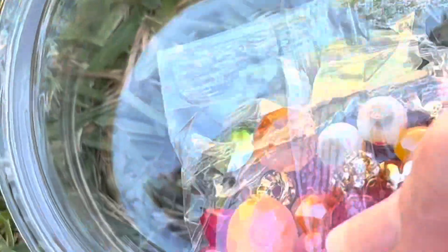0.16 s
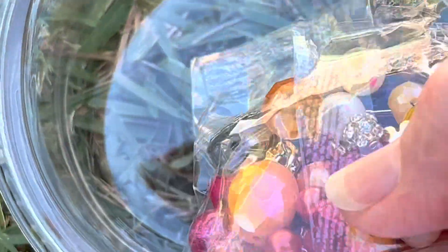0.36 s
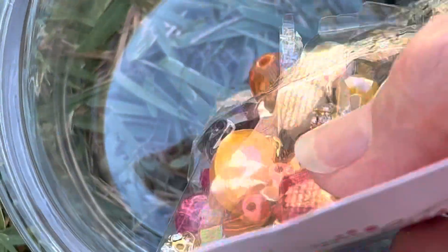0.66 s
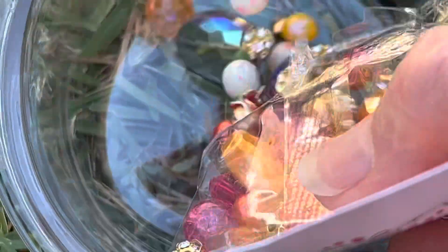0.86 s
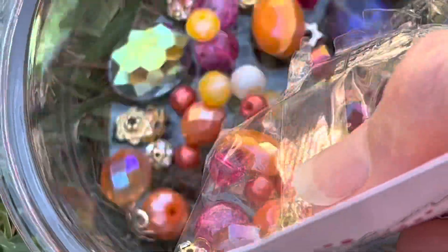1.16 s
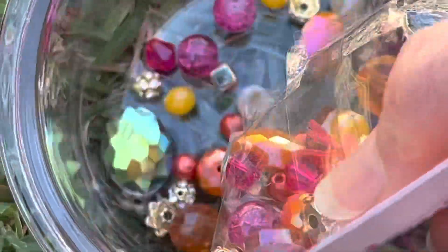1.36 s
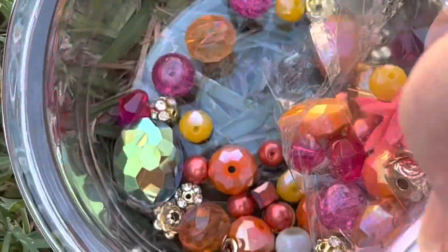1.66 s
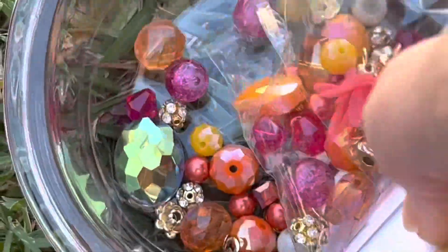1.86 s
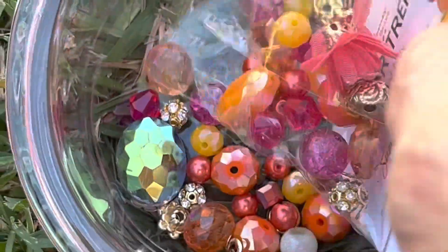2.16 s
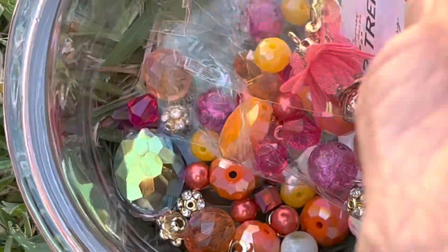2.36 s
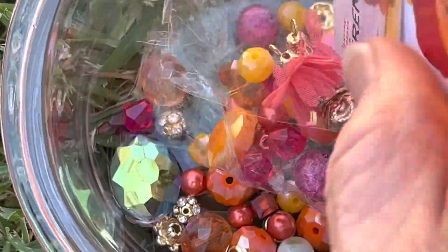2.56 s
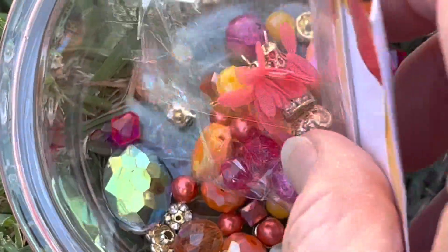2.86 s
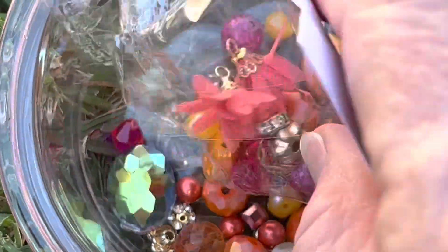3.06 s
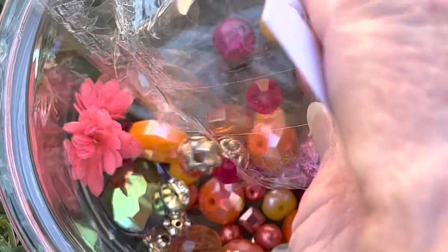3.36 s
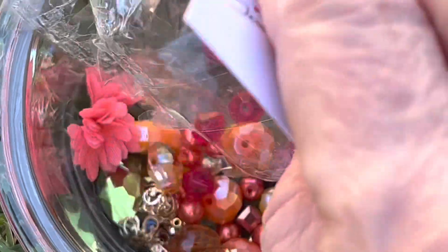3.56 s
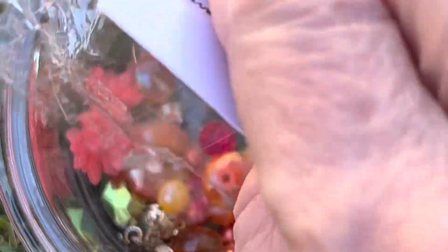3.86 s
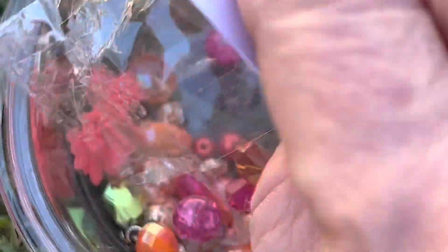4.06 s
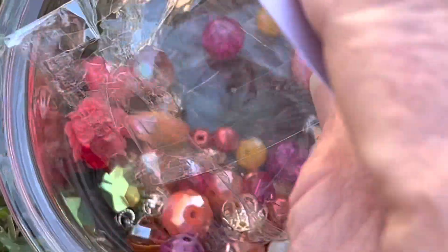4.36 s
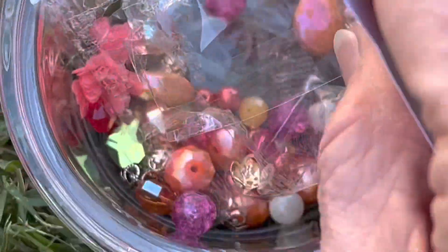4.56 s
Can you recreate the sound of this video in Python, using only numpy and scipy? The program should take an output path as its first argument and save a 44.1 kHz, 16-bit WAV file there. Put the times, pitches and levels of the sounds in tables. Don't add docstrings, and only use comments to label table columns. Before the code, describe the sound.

A close, dry stereo recording outdoors, with a quiet low hum of distant traffic and a faint motor throughout. Thin plastic creases snap near 0.1 and 0.3 seconds, then rustling gathers from 0.65. At about 0.8 glass beads and metal caps spill into a bowl on grass: a dense, bright clatter until roughly 1.4, with piercing high clinks, short metallic rings, dull bowl knocks and bag crackle. Strong plastic snaps come around 1.35 to 1.43. From 1.5 to 1.75 a bead bounces rapidly to rest amid rolling jingle. Only faint clinks and bag rustles remain until sharp creases near 2.8. From 3.0 to 4.0 the rest is shaken out in sparse, uneven clicks, strongest around 3.45. A brighter cluster of metal pings and hard clacks rings from 4.07 to 4.4, then it quiets to hum with slight plastic ticks.

```python
import sys
import numpy as np
from scipy import signal
from scipy.fft import rfft, irfft, next_fast_len
from scipy.io import wavfile
from scipy.ndimage import uniform_filter1d

SR = 44100
rng = np.random.default_rng(int(sys.argv[2]) if len(sys.argv) > 2 else 0)


def wav_out(sig):
    wavfile.write(sys.argv[1], SR, np.round(np.clip(np.atleast_2d(sig).T, -1, 1) * 32767).astype(np.int16))


def decibels_to_gain(level_db):
    exponent = np.asarray(level_db, float) / 20
    return 10 ** exponent


N = 208433

# freq_hz, density_db
HUM_SPECTRUM = [(30, -17.5), (55, 2), (110, -2.5), (220, -12.5), (400, -23.5), (900, -31.5), (2000, -35.5),
                (3200, -40), (5500, -37.5), (9000, -51), (15000, -60.5)]
# freq_hz, coherence (0 to 1)
HUM_COHERENCE = [(200, .994), (520, .15), (2600, .97)]
# freq_hz, level_db
MOTOR_LINES = [(119, -58.0), (237, -61.0)]
# freq_hz, gain_db, lead_rad
PORT_RESPONSE = [(200, 0, 0), (500, -3, -.3), (1000, -4, -.1), (1370, -10, -1.5), (1530, -2.5, -3.1),
                 (1640, 3.5, -3.0), (1720, 2, 0), (2400, 1, -.2), (5000, 0, .1), (5700, 0, .9),
                 (7000, 0, 1.2), (7750, 0, 3.08), (8650, 0, 3.2), (9300, 0, 4.1), (12300, 0, 6.35),
                 (13900, 0, 7.95), (14600, 0, 9.42)]

# peak_s, crackle_db, rise_s (per 20 dB), fall_s (per 20 dB)
HAND_MOVES = [(0.089, -44.5, .027, .027), (0.325, -54.5, .095, .21), (0.904, -32, .25, .4),
              (1.101, -33, .3, .5), (1.42, -45, .3, .4), (1.937, -50, .3, .14), (2.243, -45.5, .14, .06),
              (2.62, -53.5, .25, .08), (2.848, -45, .08, .08), (3.015, -50, .12, .23),
              (3.153, -44, .04, .35), (3.32, -43.5, .25, .3), (3.48, -41, .3, .13), (3.773, -51, .3, .12),
              (3.965, -41.5, .12, .22), (4.085, -41, .06, .24), (4.273, -41, .25, .04),
              (4.348, -50, .04, .08)]
# time_s, jingle_db
ROLLING_LEVEL = [(0.732, -81), (0.904, -29.5), (1.101, -22), (1.491, -36), (1.547, -24.5), (1.612, -44),
                 (1.802, -49), (1.937, -73), (2.08, -86), (3.12, -80), (3.48, -36.5), (3.568, -70),
                 (3.636, -86), (3.773, -39), (3.853, -69), (4.2, -72), (4.273, -57), (4.45, -85)]
# freq_hz, level_db, t60_s
JINGLE_MODES = [(9290, 0, .06), (13080, -6, .05), (13830, -6, .05), (15720, -5, .04), (5620, -13, .035)]
# freq_hz, level_db, t60_s
BOWL_MODES = [(1190, -2.5, 0.0087), (1690, -1, 0.0042), (2420, -10, 0.0044)]

# start_s, floor_db, wall_db, crack_db
POUR_CONTACTS = [(0.8105, -39.0, -29.0, -48.0), (0.8368, -41.0, -27.0, -42.0),
                 (0.8702, -43.0, -25.0, -36.0), (0.8902, -43.0, -25.0, -38.0), (0.908, -33.0, -21.0, -37.0),
                 (0.9412, -26.0, -34.0, -34.0), (0.9493, -32.0, -26.0, -33.0),
                 (0.9569, -23.0, -33.0, -27.0), (0.9752, -38.0, -22.0, -32.0),
                 (0.9819, -27.0, -26.0, -29.0), (0.9904, -28.0, -33.0, -26.0),
                 (0.9977, -25.0, -29.0, -27.0), (1.0063, -26.0, -30.0, -26.0),
                 (1.0148, -21.0, -26.0, -30.0), (1.0237, -35.0, -28.0, -34.0),
                 (1.0334, -31.0, -26.0, -28.0), (1.0428, -25.0, -23.0, -29.0),
                 (1.0546, -45.0, -30.0, -30.0), (1.0826, -40.0, -31.0, -30.0),
                 (1.0886, -32.0, -26.0, -31.0), (1.0987, -23.0, -29.0, -25.0),
                 (1.1035, -27.0, -27.0, -26.0), (1.1109, -33.0, -29.0, -37.0),
                 (1.1235, -27.0, -26.0, -34.0), (1.1329, -28.0, -39.0, -29.0),
                 (1.1435, -33.0, -38.0, -36.0), (1.1531, -32.0, -38.0, -36.0),
                 (1.1619, -26.0, -29.0, -32.0), (1.195, -35.0, -33.0, -26.0), (1.1999, -32.0, -31.0, -35.0),
                 (1.2177, -30.0, -32.0, -32.0), (1.2292, -36.0, -44.0, -33.0),
                 (1.2359, -31.0, -32.0, -33.0), (1.2453, -33.0, -34.0, -30.0),
                 (1.2682, -33.0, -34.0, -34.0), (1.273, -30.0, -33.0, -39.0), (1.304, -30.0, -35.0, -31.0),
                 (1.3162, -26.0, -36.0, -32.0), (1.3286, -28.0, -37.0, -36.0),
                 (1.3675, -30.0, -29.0, -28.0), (1.3936, -34.0, -41.0, -33.0),
                 (1.4173, -48.0, -29.0, -34.0), (1.4683, -44.0, -35.0, -43.0),
                 (1.5033, -48.0, -37.0, -44.0), (1.5143, -47.0, -32.0, -45.0)]
# start_s, floor_db, wall_db, crack_db
SHAKE_CONTACTS = [(2.9366, -45.0, -53.0, -61.0), (2.971, -53.0, -43.0, -54.0),
                  (3.1111, -46.0, -41.0, -51.0), (3.1473, -42.0, -35.0, -39.0),
                  (3.1548, -36.0, -35.0, -37.0), (3.1594, -34.0, -40.0, -51.0),
                  (3.1683, -51.0, -35.0, -39.0), (3.1826, -53.0, -40.0, -50.0),
                  (3.2014, -38.0, -41.0, -45.0), (3.2236, -43.0, -33.0, -35.0),
                  (3.2486, -46.0, -36.0, -39.0), (3.2767, -43.0, -48.0, -56.0),
                  (3.294, -45.0, -37.0, -44.0), (3.3421, -40.0, -46.0, -34.0),
                  (3.3816, -48.0, -37.0, -35.0), (3.3943, -46.0, -36.0, -38.0),
                  (3.453, -37.0, -29.0, -32.0), (3.497, -40.0, -45.0, -55.0), (3.5179, -43.0, -36.0, -43.0),
                  (3.5991, -60.0, -46.0, -55.0), (3.6413, -57.0, -47.0, -53.0),
                  (3.7039, -59.0, -41.0, -56.0), (3.7716, -39.0, -38.0, -42.0),
                  (3.7778, -39.0, -42.0, -51.0), (3.848, -48.0, -47.0, -44.0),
                  (3.8675, -42.0, -51.0, -45.0), (3.9152, -49.0, -41.0, -45.0),
                  (3.9504, -58.0, -33.0, -46.0), (3.9602, -53.0, -39.0, -40.0),
                  (3.9718, -39.0, -36.0, -48.0), (3.9769, -40.0, -31.0, -48.0),
                  (4.1012, -42.0, -31.0, -36.0), (4.1244, -35.0, -26.0, -39.0),
                  (4.1289, -38.0, -38.0, -45.0), (4.1458, -38.0, -38.0, -42.0),
                  (4.2106, -37.0, -38.0, -40.0), (4.2204, -46.0, -36.0, -39.0),
                  (4.2297, -41.0, -36.0, -46.0), (4.2425, -53.0, -43.0, -41.0),
                  (4.376, -44.0, -59.0, -46.0)]
# start_s, floor_db, wall_db, crack_db
BAG_CONTACTS = [(0.0808, -53.0, -46.0, -46.0), (0.3136, -49.0, -44.0, -51.0), (0.4991, -64.0, -49.0, -60.0),
                (0.5954, -64.0, -42.0, -53.0), (0.6685, -51.0, -40.0, -58.0), (0.6736, -48.0, -37.0, -42.0),
                (0.6898, -48.0, -41.0, -47.0), (0.7063, -52.0, -39.0, -44.0), (0.7399, -51.0, -36.0, -37.0),
                (0.7514, -42.0, -38.0, -45.0), (0.7726, -47.0, -33.0, -35.0), (0.7776, -47.0, -35.0, -38.0),
                (1.7516, -43.0, -38.0, -43.0), (1.8558, -46.0, -52.0, -47.0), (1.911, -54.0, -48.0, -53.0),
                (1.94, -45.0, -52.0, -52.0), (1.9859, -53.0, -50.0, -48.0), (2.1492, -51.0, -49.0, -53.0),
                (2.1782, -46.0, -53.0, -48.0), (2.2139, -44.0, -38.0, -47.0), (2.2239, -50.0, -39.0, -43.0),
                (2.2365, -53.0, -36.0, -47.0), (2.2419, -50.0, -41.0, -54.0), (2.2482, -46.0, -35.0, -52.0),
                (2.2602, -48.0, -48.0, -50.0), (2.4365, -60.0, -49.0, -63.0), (2.5871, -69.0, -53.0, -48.0),
                (2.7741, -44.0, -42.0, -51.0), (2.8446, -42.0, -47.0, -42.0), (2.8527, -39.0, -45.0, -46.0),
                (2.8579, -52.0, -40.0, -48.0)]
# start_s, floor_db, wall_db, crack_db
CREASE_SNAPS = [(0.0754, -59.0, -46.0, -33.0), (0.0979, -48.0, -44.0, -32.0), (0.1148, -38.0, -27.0, -29.0),
                (0.275, -51.0, -33.0, -33.0), (0.294, -47.0, -42.0, -45.0), (0.5396, -56.0, -48.0, -35.0),
                (0.62, -55.0, -42.0, -46.0), (0.6845, -41.0, -32.0, -34.0), (0.714, -46.0, -37.0, -24.0),
                (0.746, -35.0, -28.0, -25.0), (0.768, -43.0, -35.0, -34.0), (1.3418, -37.0, -22.0, -21.0),
                (1.425, -23.0, -23.0, -15.0), (1.437, -27.0, -28.0, -17.0), (1.925, -35.0, -47.0, -30.0),
                (1.9352, -38.0, -36.0, -36.0), (2.0035, -45.0, -46.0, -42.0), (2.1713, -37.0, -40.0, -30.0),
                (2.7246, -47.0, -41.0, -38.0), (2.7919, -38.0, -33.0, -32.0), (2.8022, -44.0, -39.0, -38.0),
                (2.8203, -38.0, -29.0, -21.0), (2.8381, -35.0, -30.0, -16.0), (3.0149, -24.0, -32.0, -32.0),
                (3.0238, -31.0, -30.0, -26.0), (3.0583, -39.0, -34.0, -26.0), (3.0825, -33.0, -48.0, -34.0),
                (4.0185, -37.0, -25.0, -41.0), (4.4749, -56.0, -50.0, -32.0), (4.687, -48.0, -49.0, -47.0)]
# start_s, floor_db, wall_db, tick_db
HARD_CLACKS = [(0.483, -65.0, -48.0, -45.0), (0.7853, -22.0, -28.0, -25.0), (0.8265, -26.0, -32.0, -37.0),
               (0.8454, -36.0, -35.0, -14.0), (0.8749, -18.0, -22.0, -21.0), (0.8957, -23.0, -23.0, -23.0),
               (0.9212, -19.0, -31.0, -21.0), (0.926, -19.0, -21.0, -19.0), (0.9694, -22.0, -19.0, -16.0),
               (1.1683, -34.0, -30.0, -26.0), (1.1787, -30.0, -29.0, -17.0), (1.3487, -30.0, -28.0, -27.0),
               (1.4088, -35.0, -35.0, -24.0), (1.5362, -32.0, -38.0, -27.0), (1.7622, -43.0, -49.0, -37.0),
               (1.85, -43.0, -53.0, -31.0), (2.562, -52.0, -52.0, -37.0), (3.0805, -34.0, -40.0, -31.0),
               (3.1423, -48.0, -32.0, -24.0), (3.3473, -43.0, -41.0, -27.0), (3.4351, -35.0, -37.0, -22.0),
               (3.4471, -57.0, -26.0, -20.0), (3.4845, -30.0, -32.0, -34.0), (3.536, -44.0, -39.0, -25.0),
               (3.6708, -58.0, -39.0, -33.0), (3.7608, -44.0, -38.0, -33.0), (4.073, -35.0, -23.0, -18.0),
               (4.141, -38.0, -38.0, -27.0), (4.1518, -36.0, -38.0, -20.0), (4.1826, -37.0, -31.0, -35.0),
               (4.3351, -41.0, -53.0, -25.0)]

# start_s, main_db, face_db, t60_s
CAP_STRIKES = [(0.8459, -15.5, -23, .042), (0.9207, -53, -48, .104), (0.939, -24, -36, .04),
               (0.977, -31, -36, .06), (0.9978, -31, -40, .08), (1.054, -23, -35, .12),
               (1.0655, -27, -40, .06), (1.082, -27, -42, .035), (1.102, -31, -28, .052),
               (1.124, -31, -42, .06), (1.142, -44, -49, .14), (1.1963, -40, -41, .4),
               (1.27, -37, -53, .06), (1.3212, -33, -40, .055), (1.3655, -30, -46, .04),
               (2.033, -66, -80, .3), (3.974, -48, -65, .06), (4.0747, -16, -23, .062),
               (4.1019, -21, -52, .06), (4.125, -55, -55, .1), (4.141, -42, -52, .1),
               (4.1847, -17, -29, .066), (4.22, -23.5, -44, .07), (4.2434, -33, -42, .14),
               (4.257, -30, -45, .2), (4.3364, -27, -48, .2), (4.3829, -34.5, -56, .11)]
# freq_hz, decay_speed (against the main mode)
CAP_MODES = [(5615, 1.0), (2378, .75), (9950, 1.05), (15720, 1.1)]

# first_hz, second_hz
SHARED_MODE_HZ = (9275, 9322)
# freq_hz, decay_speed (against the shared mode)
UPPER_MODES = [(13080, 1.1), (13830, 1.3), (15615, 1.0)]
# start_s, shared_db, own_db, t60_s
FIRST_STRIKES = [(0.7858, -10.5, -19.5, .068), (0.8268, -12.5, -18.5, .047), (0.8748, -11.5, -29, .12),
                 (0.8953, -14, -18, .118), (0.9025, -13, -20, .09), (0.9812, -9.5, -26, .14),
                 (1.0333, -36, -26, .3), (1.0527, -24, -33, .28), (1.0913, -26, -20, .23),
                 (1.2077, -16, -31.5, .061), (1.8139, -30, -53, .04), (1.8631, -32.5, -50, .11),
                 (1.9246, -37.5, -62, .13), (2.565, -45, -67, .05), (2.627, -40, -48, .06),
                 (2.711, -39.5, -49, .057), (4.2192, -27, -35, .03)]
# start_s, shared_db, own_db,
# t60_s
FLOOR_BOUNCES = [
    (1.5517, -11, -30, .047),
    (1.5971, -12.5, -27, .064),
    (1.6319, -26, -35, .138),
    (1.6463, -15, -27, .079),
    (1.6635, -17.5, -32, .083),
    (1.6974, -16, -23, .056),
    (1.7238, -16.5, -21, .022),
    (1.7411, -24, -33, .12),
]
# start_s, shared_db, own_db, t60_s
SECOND_STRIKES = [(0.9209, -15, -23, .11), (0.9662, -20, -26, .068), (1.0155, -15, -28.5, .036),
                  (1.073, -23, -37, .12), (1.1666, -17, -27, .21), (1.2171, -22, -28, .13),
                  (1.234, -19, -22, .23), (1.2539, -23, -22, .42), (1.3757, -25, -21, .11),
                  (1.4655, -16, -28, .026), (1.4958, -39, -37, .027), (1.522, -22, -18, .055),
                  (1.5299, -18, -21, .134), (1.538, -19.5, -19, .029), (1.8024, -25, -56, .022),
                  (1.8241, -29.5, -54, .053), (1.845, -31, -50, .039), (1.9856, -31, -41, .067),
                  (2.055, -42, -54, .035), (2.255, -48, -64, .06), (2.1215, -40, -59, .042),
                  (2.1609, -44, -58, .16)]
# start_s, shared_db, own_db, t60_s
SHAKEN_STRIKES = [(2.347, -48, -66, .006), (3.0036, -33, -55, .006), (2.98, -45, -68, .065),
                  (3.2534, -35, -50, .37), (3.3, -27, -34, .11), (3.3259, -24, -28, .058),
                  (3.3647, -35, -42, .3), (3.4268, -26.5, -39, .22), (3.4849, -13, -16, .033),
                  (3.4998, -22, -26, .042), (3.5363, -34, -39, .054), (3.6224, -35, -38, .025),
                  (3.642, -30, -37, .029), (3.6723, -31.5, -34, .052), (3.7109, -32, -52, .052),
                  (3.7609, -39, -42, .07), (3.771, -25, -43, .037), (3.787, -18, -24, .029),
                  (3.8056, -37, -48, .089), (3.8221, -26, -27, .067), (3.8664, -28, -34, .058),
                  (4.587, -56, -64, .01), (3.8995, -27.5, -39, .036), (3.9304, -25, -43, .031),
                  (3.9515, -25.5, -43, .033), (3.9822, -24, -28, .021), (4.0069, -41, -46, .22),
                  (4.1835, -22, -21, .023), (4.2573, -39, -41, .127), (4.296, -31, -41, .034)]

SILENT_DB = -150


def band(x, low_hz, high_hz, order=2):
    return signal.sosfilt(signal.butter(order, [low_hz, high_hz], "band", fs=SR, output="sos"), x + 1e-18)


def rms_one(x):
    return x / np.sqrt(np.mean(x ** 2) + 1e-20)


def at_hz(points, hz):
    at, value = np.transpose(points)
    return np.interp(np.log(hz + 1), np.log(at), value)


def ring(clicks, hz, t60):
    radius = decibels_to_gain(-60 / (t60 * SR))
    angle = 2 * np.pi * hz / SR
    return signal.lfilter([0, np.sin(angle)], [1, -2 * radius * np.cos(angle), radius ** 2], clicks + 1e-18)


def struck(hit_s, level_db, hz, t60, rise_s=.0003, flutter_db=1.4):
    t = np.arange(N) / SR
    last = np.maximum(np.searchsorted(hit_s, t) - 1, 0)
    age = np.maximum(t - hit_s[last], 0)
    flutter = decibels_to_gain(flutter_db * rms_one(band(rng.standard_normal(N), 30, 150)))
    onset = 1 - np.exp(-age / rise_s)
    decay = decibels_to_gain(level_db[last] - 60 * age / t60[last])
    return onset * flutter * decay * np.sin(2 * np.pi * hz[last] * age)


def click_train(start_s, level_db):
    train = np.zeros(N)
    train[np.round(start_s * SR).astype(int)] = decibels_to_gain(level_db)
    return train


def dying_noise(train, decay_s):
    envelope = signal.lfilter([1], [1, -np.exp(-1 / (decay_s * SR))], train)
    return envelope * rng.choice([-1, 1], N)


def grains(per_s, spread_db, clump_db):
    clumps = rms_one(band(rng.standard_normal(N), 9.2, 40, order=1))
    sizes = decibels_to_gain(spread_db * np.minimum(rng.exponential(1, N), 4)) * rng.choice([-1, 1], N)
    return sizes * decibels_to_gain(clump_db * clumps) * (rng.random(N) < per_s / SR)


def ports(left, other=None, aside=0.0):
    hz = np.fft.rfftfreq(N, 1 / SR)
    at, gain_db, lead_rad = np.transpose(PORT_RESPONSE)
    shift = np.interp(hz, at, lead_rad)
    shift = shift + aside * np.sin(shift)
    right = left if other is None else other
    response = decibels_to_gain(np.interp(hz, at, gain_db)) * np.exp(1j * shift)
    return np.array([left, irfft(rfft(right) * response, N)])


def turn_in_spells(pair):
    slip_rad, share, treble_hz = .5, .4, 800
    count = N // 1024 + 1
    spells = (rng.random(count) < share) * rng.choice([-1, 1], count)
    held = np.repeat(spells, 1024)[143:N + 143].astype(float)
    slip = slip_rad * uniform_filter1d(held, size=128)
    hz = np.fft.rfftfreq(N, 1 / SR)
    treble = irfft(rfft(pair[1]) * (hz > treble_hz), N)
    analytic = signal.hilbert(treble, next_fast_len(N))[:N]
    turned = np.real(analytic * np.exp(1j * slip))
    return np.array([pair[0], pair[1] - treble + turned])


def hum():
    hz = np.fft.rfftfreq(N, 1 / SR)
    alike = np.clip(at_hz(HUM_COHERENCE, hz), 0, 1)
    one, two = rfft(rng.standard_normal((2, N))) * decibels_to_gain(at_hz(HUM_SPECTRUM, hz))
    other = alike * one + np.sqrt(1 - alike ** 2) * two
    return decibels_to_gain(-42.5) * rms_one(ports(irfft(one, N), irfft(other, N)))


def drone():
    return sum(decibels_to_gain(db) * rms_one(band(rng.standard_normal(N), hz * .97, hz * 1.03, order=1))
               for hz, db in MOTOR_LINES)


def bowl(clicks, scatter_db):
    unloaded_db = -6.0 * (np.arange(N) < .78 * SR)
    modes = 0
    for k, (hz, db, t60) in enumerate(BOWL_MODES):
        feed_db = db + unloaded_db * (k == 0) + scatter_db * rng.standard_normal(N)
        modes = modes + (-1) ** k * ring(clicks * decibels_to_gain(feed_db), hz, t60)
    return band(modes, 470, 8000)


def foil(clicks, cycles):
    pitches_hz = np.geomspace(1700, 7500, 10)
    dealt = rng.integers(0, 10, N)
    return sum(ring(clicks * (dealt == k), hz, cycles / hz) for k, hz in enumerate(pitches_hz))


def motion():
    t = np.arange(N) / SR
    power = decibels_to_gain(2 * -80.0)
    for peak_s, db, rise_s, fall_s in HAND_MOVES:
        away = np.where(t < peak_s, (peak_s - t) / rise_s, (t - peak_s) / fall_s)
        power = power + decibels_to_gain(2 * db - 40 * away)
    hand_db = 10 * np.log10(power)
    roll_db = np.interp(t, *np.transpose(ROLLING_LEVEL))
    bag_rumble = decibels_to_gain(-52.0 + .75 * (hand_db + 50))
    bowl_rumble = decibels_to_gain(hand_db + 2.5 + np.minimum(0, .5 * (roll_db + 34.0)))
    tick = np.hypot(decibels_to_gain(hand_db - 14.0), decibels_to_gain(-52.0 + .85 * (roll_db + 40)))
    return np.hypot(bag_rumble, bowl_rumble), decibels_to_gain(hand_db), tick, decibels_to_gain(roll_db)


def slide():
    rumble, crackle, tick, jingle = motion()
    spots = []
    for spot in range(2):
        clicks = grains(per_s=1600, spread_db=5.0, clump_db=3.5)
        evened = np.sign(clicks) * np.sqrt(np.abs(clicks))
        creases = grains(per_s=430, spread_db=3.0, clump_db=1.5)
        out = decibels_to_gain(-4.5) * rumble * rms_one(bowl(evened, scatter_db=7.5))
        out += decibels_to_gain(-4.5) * crackle * rms_one(band(clicks, 3600, 9000))
        out += decibels_to_gain(-5.5) * crackle * rms_one(foil(creases, cycles=26.0))
        out += decibels_to_gain(6.5) * tick * rms_one(band(clicks, 7000, 16500))
        spots.append(out)
    touches = rms_one(grains(per_s=900, spread_db=2.5, clump_db=1.5))
    jingle = jingle * (jingle > decibels_to_gain(-72))
    rings = sum(ring(jingle * touches * decibels_to_gain(db + 3 * rng.standard_normal(N)), hz, t60)
                for hz, db, t60 in JINGLE_MODES)
    return spots[0] + decibels_to_gain(-20) * rings, spots[1]


def taps():
    small = np.array(POUR_CONTACTS + SHAKE_CONTACTS + BAG_CONTACTS)
    large = np.array(CREASE_SNAPS + HARD_CLACKS)
    bounces = [(s, *[-25.5 + .55 * db] * 2) for s, db, *_ in FLOOR_BOUNCES]
    rows = np.vstack([small[:, :3], large[:, :3], bounces])
    s, floor_db, wall_db = rows[np.argsort(rows[:, 0])].T
    chance = np.clip(rng.standard_normal((2, len(s))), -2, 2)
    floor_hz = 1165 * (1 + .05 * chance[0])
    wall_hz = 1980 * (1 + .11 * chance[1])
    knocks = struck(s, floor_db + 8.0, floor_hz, np.full(len(s), .011))
    knocks += struck(s, wall_db + 6.5, wall_hz, np.full(len(s), .0065))
    cracks = dying_noise(click_train(small[:, 0], small[:, 3] + 13.0), decay_s=.0009)
    return band(knocks, 500, 5000) + band(cracks, 3100, 7600)


def contacts():
    rows = []
    for s, floor_db, wall_db, crack_db in CREASE_SNAPS:
        tick_db = crack_db - 35.0 + .8 * (crack_db - max(floor_db, wall_db))
        rows.append((s, SILENT_DB, crack_db, tick_db))
    hard = [(s, SILENT_DB, tick_db) for s, _, _, tick_db in HARD_CLACKS]
    hard += [(s, SILENT_DB, db - 15.0) for s, db, *_ in FLOOR_BOUNCES]
    hard += [(s, db - 22.0, db - 6.0) for s, db, *_ in SHAKEN_STRIKES]
    hard += [(s, db - 21.0, db - 12.0) for s, db, *_ in FIRST_STRIKES + SECOND_STRIKES]
    for s, knock_db, tick_db in hard:
        crack_db = -24.0 + 1.3 * (tick_db + 20)
        rows.append((s, knock_db, crack_db, tick_db))
    return rows


def snaps():
    s, knock_db, crack_db, tick_db = np.transpose(contacts())
    knock = dying_noise(click_train(s, knock_db), decay_s=.00098)
    crack = dying_noise(click_train(s, crack_db), decay_s=.0027)
    tick = dying_noise(click_train(s, tick_db), decay_s=.0012)
    out = decibels_to_gain(-11.5) * bowl(knock, scatter_db=3.0)
    out += band(crack, 2700, 6600)
    return out + decibels_to_gain(6.5) * band(tick, 5400, 16500)


def cap():
    s, main_db, face_db, t60 = np.transpose(CAP_STRIKES)
    level_db = main_db, face_db - 7.0, face_db, main_db - 8.0
    detune = 1 + 0.0003 * rng.standard_normal((len(s), 4))
    return sum(struck(s, level_db[k] + 7.5, hz * detune[:, k], t60 / speed)
               for k, (hz, speed) in enumerate(CAP_MODES))


def beads():
    first_rows = FIRST_STRIKES + FLOOR_BOUNCES
    rows = np.array(first_rows + SECOND_STRIKES + SHAKEN_STRIKES)
    first = np.arange(len(rows)) < len(first_rows)
    order = np.argsort(rows[:, 0])
    s, shared_db, own_db, t60 = rows[order].T
    first = first[order]
    first_db = np.where(first, own_db, own_db - 13.0)
    second_db = np.where(first, own_db - 7.0, own_db)
    chance = rng.standard_normal((len(s), 5))
    detune = 1 + 0.001 * chance
    top_db = first_db - 3 + 3 * chance[:, 4]
    shared_hz = np.where(first, *SHARED_MODE_HZ)
    out = struck(s, shared_db + 2.5, shared_hz * detune[:, 0], t60)
    upper_db = first_db, second_db, top_db
    for k, (hz, speed) in enumerate(UPPER_MODES):
        out += struck(s, upper_db[k] + 4.5, hz * detune[:, k + 1], t60 / speed)
    return out


def scene():
    near, beside = slide()
    pour = ports(beads() + cap() + snaps() + near + taps())
    return turn_in_spells(pour + ports(beside, aside=.9)) + hum() + drone()


def band_limit(x):
    return signal.sosfilt(signal.butter(12, 16970, fs=SR, output="sos"), x)


def record(dry):
    housing = dry - 0.4 * band(dry, 2800, 4480, order=1)
    mix = signal.sosfilt(signal.cheby2(16, 35, 15960, fs=SR, output="sos"), housing)
    return band_limit(mix)


dry = scene()
out = record(dry)
wav_out(out)
```